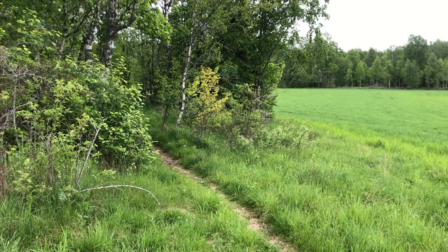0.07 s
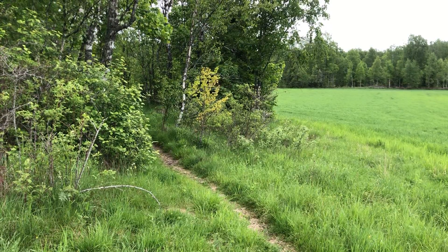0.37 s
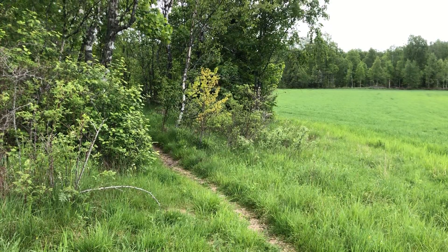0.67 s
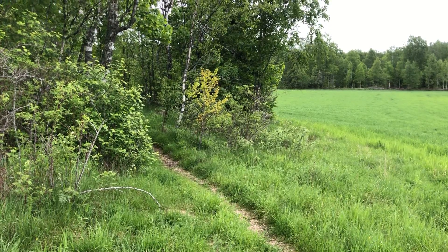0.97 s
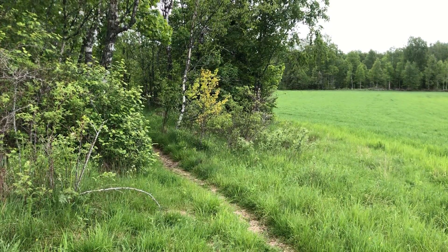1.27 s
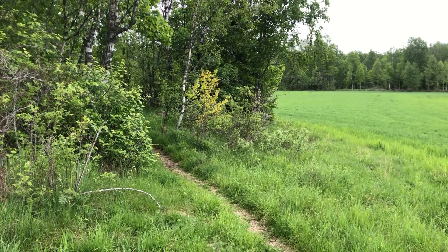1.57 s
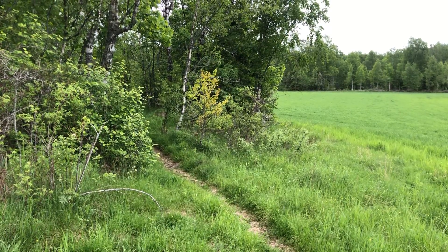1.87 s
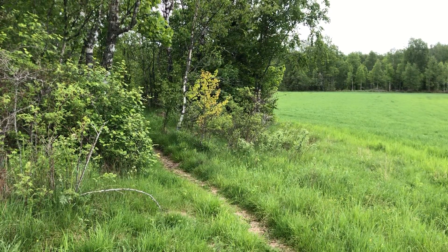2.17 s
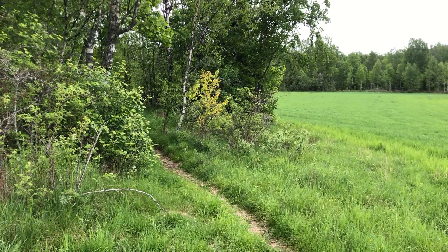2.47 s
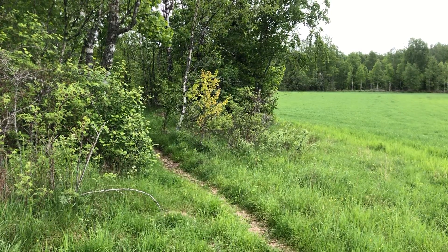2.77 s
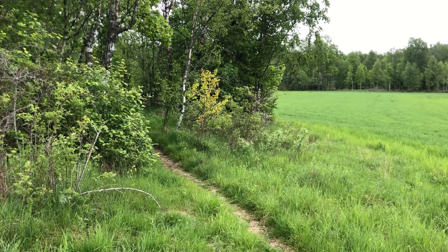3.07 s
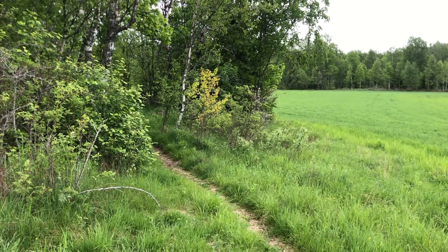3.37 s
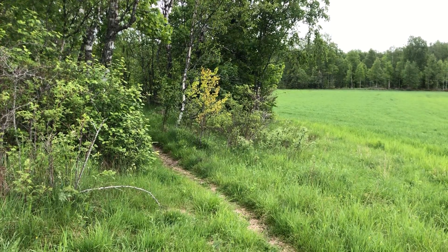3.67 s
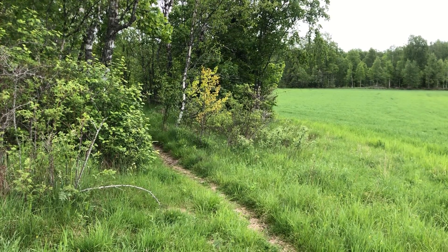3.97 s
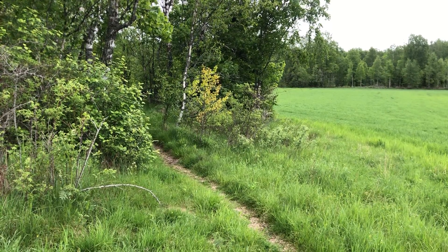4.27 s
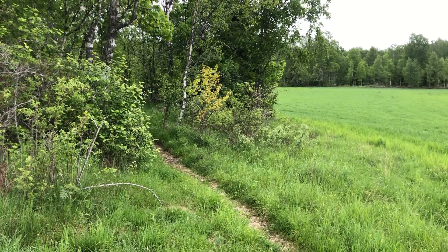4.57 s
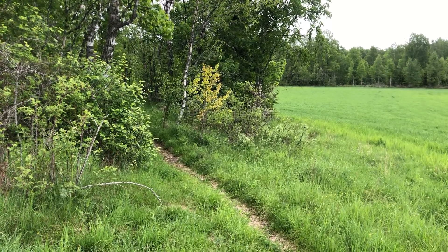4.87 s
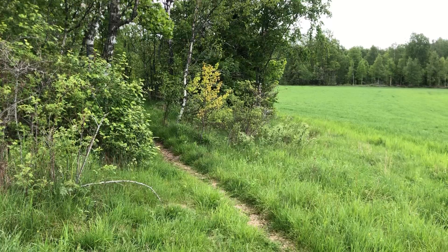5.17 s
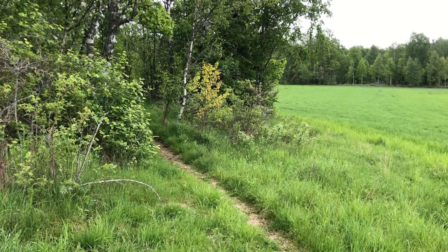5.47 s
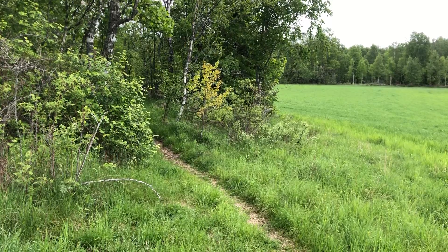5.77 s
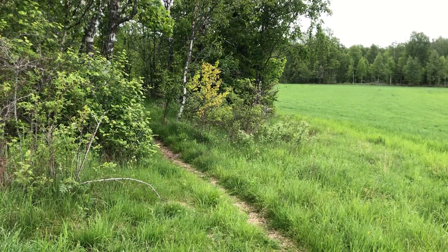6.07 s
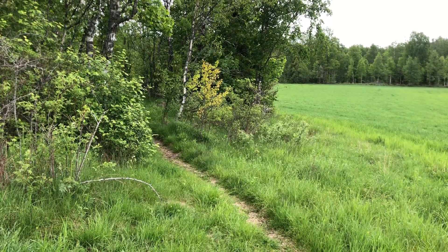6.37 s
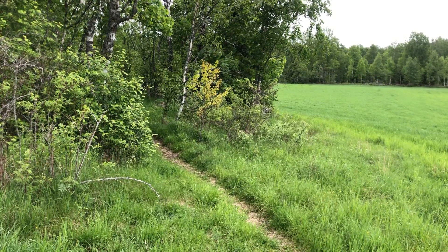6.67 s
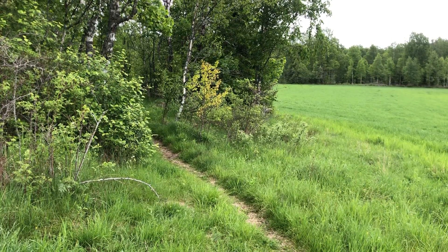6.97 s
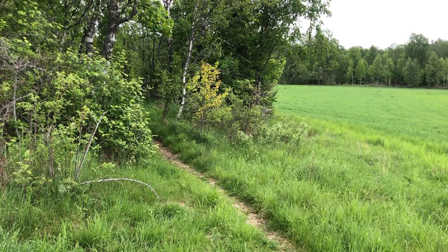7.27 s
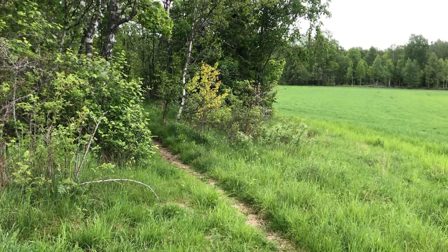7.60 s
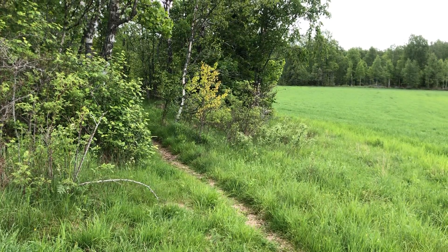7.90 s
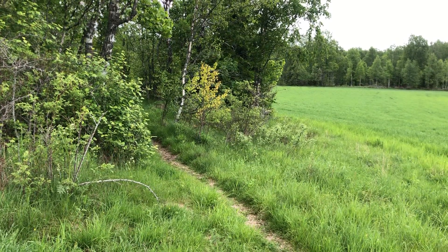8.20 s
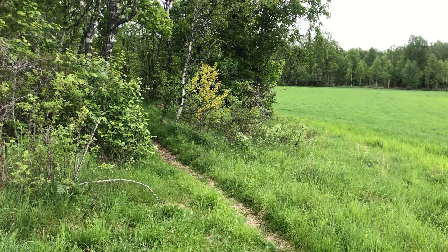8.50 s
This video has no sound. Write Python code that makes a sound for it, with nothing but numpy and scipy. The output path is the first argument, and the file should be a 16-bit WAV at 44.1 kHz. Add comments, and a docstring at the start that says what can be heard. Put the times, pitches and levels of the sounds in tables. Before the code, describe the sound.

At the edge of a meadow, a bird in a bush close to the microphone reels a high, fast, even trill like an insect. It runs for about seven seconds and stops. Farther off, other birds whistle and twitter faintly with a slight woodland echo, carrying on after the trill ends. Underneath are a very quiet distant hush, stirring leaves and a few soft bumps of breeze on the microphone.

```python
"""A grasshopper warbler reels from a bush close to the microphone, at the edge of a meadow: 27 times
a second its syrinx gives a sharp tick and a short falling note, until it slows and stops after seven
seconds. Farther off, thrushes and warblers whistle in the wood, echoing from leaves and trunks.
Behind them lie a distant hush and stirring foliage; a light breeze now and then bumps the microphone."""
import sys
import numpy as np
from scipy import signal
from scipy.fft import rfft, irfft, next_fast_len
from scipy.io import wavfile
from scipy.ndimage import uniform_filter1d, map_coordinates

SR = 44100
rng = np.random.default_rng(int(sys.argv[2]) if len(sys.argv) > 2 else 0)


def waveform_to_disk(signal):
    """Save audio, clipped to [-1, 1], as 16-bit WAV at the path in sys.argv[1]."""
    frames = np.transpose(np.atleast_2d(signal))
    scaled = np.clip(frames, -1, 1) * 32767
    samples = np.round(scaled).astype(np.int16)
    wavfile.write(sys.argv[1], SR, samples)


N = 385434


def amp(db):
    """Decibels to gain."""
    return 10 ** (np.asarray(db) / 20)


def unit(x):
    """Scale to rms 1."""
    return x / np.sqrt(np.mean(x ** 2) + 1e-20)


def along(points, hz):
    """Read (frequency, value) points at hz, on a log frequency axis."""
    f, v = np.transpose(points)
    return np.interp(np.log(hz + 1), np.log(f + 1), v)


def wobble(rate, size=N):
    """A smooth random curve, rate knots a second."""
    knots = rng.standard_normal(int(size * rate / SR) + 4)
    return map_coordinates(knots, [np.arange(size) * rate / SR])


def bump(s, width):
    """A bell-shaped rise and fall around time s."""
    return np.exp(-.5 * ((np.arange(N) / SR - s) / width) ** 2)


def progress(length):
    """0 to 1 over a note of this length in s."""
    return np.linspace(0, 1, int(length * SR))


def filtered(x, response):
    """Filter x by a gain given as a function of frequency."""
    m = next_fast_len(N + SR // 2)
    return irfft(rfft(x, m) * response(np.fft.rfftfreq(m, 1 / SR)), m)[:N]


def noise(spectrum):
    """Noise of rms 1, coloured by rows of f/Hz, relative level/dB."""
    return unit(filtered(rng.standard_normal(N), lambda hz: amp(along(spectrum, hz))))


def add(track, s, sound):
    """Mix a sound into the track from time s on."""
    at = round(s * SR) + np.arange(len(sound))
    inside = (at >= 0) & (at < N)
    track[at[inside]] += sound[inside]


# spectrum of the far background: f/Hz, relative level/dB
HUSH_SPECTRUM = [(15, -62), (25, -17), (71, 1), (149, -0.5), (202, -4.5), (501, -6), (967, -9), (1400, -16),
                 (1820, -18.5), (3080, -120)]
def distant_hush(db=-64.5):
    """A low, nearly steady hush from far across the meadow."""
    return amp(db + .98 * wobble(2.12)) * noise(HUSH_SPECTRUM)


def far_swell(db=-68):
    """A dull, hollow rush rises and fades in the distance."""
    hollow = noise([(300, -30), (520, 0), (650, -2), (1100, -14), (3000, -80)])
    return amp(db) * bump(7.53, width=.17) * hollow


# spectrum of the rustle: f/Hz, relative level/dB
LEAF_SPECTRUM = [(900, -10), (1500, 0), (3500, 0), (5000, -4), (8000, -12), (15500, -13.5), (17000, -40)]
def foliage(db=-73.5):
    """Leaves stir faintly along the meadow's edge."""
    return amp(db + .5 * wobble(2)) * noise(LEAF_SPECTRUM)


# puffs of air on the microphone: t/s, level/dB, width/s
MIC_PUFFS = [(0.433, -57.5, 0.024), (0.64, -52.5, 0.014), (0.718, -48, 0.0074), (1.277, -66, 0.017),
             (2.398, -57, 0.036), (3.337, -47.5, 0.01), (3.446, -62, 0.026), (4.316, -54, 0.024),
             (5.4, -69, 0.14)]
def wind_on_microphone(breeze_db=-74):
    """The breeze buffets the microphone: a low rumble with a few soft bumps."""
    puffs = sum(amp(db) * bump(s, width) for s, db, width in MIC_PUFFS)
    breeze = amp(breeze_db + 3 * wobble(6))
    rumble = noise([(26, -50.5), (46, -1), (80, -3), (140, -9.5), (300, -29.5), (1000, -84.5)])
    return (puffs + breeze) * rumble


def scatter(x, decay):
    """Dense echoes: a noise tail in which each frequency dies at its own speed."""
    hz, t, spectra = signal.stft(rng.standard_normal(SR // 2), SR, nperseg=256)
    fade = amp(-60 * t / along(decay, hz)[:, None])
    tail = signal.istft(spectra * fade, SR, nperseg=256)[1]
    return signal.fftconvolve(x, tail / np.linalg.norm(tail))[:N]


# reverberation of the wood: f/Hz, t60/s
WOOD_DECAY = [(1500, .55), (4000, .28), (12000, .2)]
def wood_echoes(songs):
    """Leaves and trunks throw the songs back; the treble dies first."""
    return scatter(songs, WOOD_DECAY)


def chatter(centre_hz, pace):
    """A barely audible singer: wandering whistles that come and go at random."""
    pitch = centre_hz * np.exp(.15 * wobble(2 * pace))
    bursts = np.clip(wobble(pace), 0, 1) ** 2
    return unit(bursts * np.sin(2 * np.pi * np.cumsum(pitch) / SR))


def sing(pitch, db, waver_hz=12):
    """A bird's pure note along a pitch line; it wavers a little and swells in its middle."""
    size = len(pitch)
    swell = np.abs(np.sin(np.linspace(0, np.pi, size))) ** .8
    gain = amp(db + 2 * wobble(60, size))
    phase = 2 * np.pi * np.cumsum(pitch + waver_hz * wobble(127, size)) / SR
    return swell * gain * np.sqrt(2) * np.sin(phase)


# phrases from deep in the wood: t/s, length/s, f/Hz, level/dB
DEEP_PHRASES = [(0.901, 0.15, 2650, -71.5), (4.882, 0.16, 2330, -69.5), (5.85, 0.21, 2660, -73),
                (7.65, 0.26, 1865, -67), (8.32, 0.13, 1790, -67)]
def faint_phrases(wander=.039, turns_per_s=16):
    """Far singers, each wandering around one pitch."""
    songs = np.zeros(N)
    for s, length, hz, db in DEEP_PHRASES:
        pitch = hz * np.exp(wander * wobble(turns_per_s, int(length * SR)))
        add(songs, s, sing(pitch, db))
    return songs


# bouts of twittering in the wood: t/s, length/s, centre f/Hz, level/dB
TWITTER_BOUTS = [(1.422, 1.05, 2750, -66), (3.147, .55, 3520, -66.5)]
def twitters(every_s=.085, note_s=.029, sweep=.123, spread=.072):
    """Runs of brief notes, each sweeping up or down at a pitch of its own."""
    songs = np.zeros(N)
    for start, length, hz, db in TWITTER_BOUTS:
        for s in np.arange(start, start + length, every_s):
            late, high, way, loud = rng.standard_normal(4)
            glide = np.sign(way) * sweep * (2 * progress(note_s) - 1)
            add(songs, s + late * note_s / 2, sing(hz * np.exp(spread * high + glide), db + 2 * loud))
    return songs


# kinds of note: start, middle, end as shares of the pitch
NOTE_SHAPES = {"scoop": (1.04, 0.94, 1.4), "slur": (.97, 0.98, .87), "flick": (1.24, 0.98, 0.835),
               "rise": (.93, 0.94, 1.28), "hold": (0.93, 0.97, 0.96)}
# the songbird's motifs: t/s, kind of note, times sung, note length/s, f/Hz, level/dB
SONGBIRD_MOTIFS = [(1.457, "scoop", 4, .068, 4450, -58.5), (1.899, "flick", 1, 0.022, 3140, -60),
                   (1.969, "slur", 2, 0.15, 4220, -58.5), (2.49, "flick", 1, 0.048, 4650, -59),
                   (2.613, "slur", 3, .097, 3195, -66), (2.667, "flick", 1, 0.049, 4700, -62),
                   (3.13, "rise", 3, 0.052, 4400, -66), (7.255, "rise", 1, 0.03, 3900, -68),
                   (7.361, "rise", 1, .075, 3740, -63.5), (8.089, "flick", 1, .046, 3260, -54),
                   (8.179, "hold", 1, 0.041, 3300, -52), (8.217, "flick", 1, 0.016, 3920, -56.5),
                   (8.222, "hold", 1, 0.033, 4320, -56)]
def small_songbird(pause_s=.064):
    """A small bird off in the wood sings curved notes, singly or repeated."""
    songs = np.zeros(N)
    for s, kind, times, length, hz, db in SONGBIRD_MOTIFS:
        parabola = np.polyfit([0, .5, 1], NOTE_SHAPES[kind], 2)
        pitch = hz * np.polyval(parabola, progress(length))
        for k in range(round(times)):
            add(songs, s + k * (length + pause_s), sing(pitch, db))
    return songs


# warbled notes, each around a straight glide: t/s, length/s, start f/Hz, end f/Hz, level/dB
TRILL_NOTES = [(0.319, 0.23, 2030, 2270, -67.5), (0.81, 0.13, 2170, 2105, -67),
               (2.764, 0.17, 2100, 2053, -62.5), (5.243, 0.23, 2220, 2057, -63.5),
               (5.609, 0.26, 2135, 1830, -69), (6.25, 0.16, 2340, 2370, -68),
               (6.567, 0.21, 2116, 2000, -66), (6.982, 0.12, 2060, 2240, -63.5),
               (7.089, .2, 2336, 2266, -59.5), (7.971, .092, 3170, 4280, -59.5)]
def far_trills(warble_hz=50.9, depth_at_2khz=.04, droop=.08):
    """Trills from the wood: the pitch droops at both ends, and higher notes warble more widely."""
    songs = np.zeros(N)
    for s, length, start, end, db in TRILL_NOTES:
        u = progress(length)
        glide = start + (end - start) * u
        depth = depth_at_2khz * (glide / 2000) ** 2.5
        warble = depth * np.sin(2 * np.pi * warble_hz * length * u + 1.3 * wobble(70, len(u)))
        add(songs, s, sing(glide * (1 + warble - droop * (2 * u - 1) ** 2), db))
    return songs


# fluty whistles in the wood: t/s, length/s, start f/Hz, goal f/Hz, level/dB
THRUSH_WHISTLES = [ (0.593, 0.061, 2290, 1540, -65), (1.212, .13, 2680, 2440, -66),
                   (1.37, 0.16, 2050, 1850, -69.5), (2.653, 0.13, 2150, 1880, -66.5),
                   (3.002, 0.1, 2030, 1937, -62.5), (3.257, 0.2, 2990, 2420, -59),
                   (4.67, 0.13, 2020, 2085, -68), (5.168, 0.074, 2130, 1624, -63),
                   (6.214, 0.076, 1730, 2500, -64), (6.875, .12, 2640, 2366, -60),
                   (6.908, 0.074, 2396, 1717, -59.5), (7.15, 0.106, 1940, 1526, -57),
                   (7.234, 0.27, 2440, 2370, -57), (7.381, 0.087, 1780, 1670, -57.5),
                   (7.431, 0.13, 2090, 1947, -53), (7.739, 0.27, 2540, 2653, -56.5),
                   (8.473, 0.24, 2416, 1945, -56.5)]
def thrushes(goal_s=.145):
    """Each whistle swoops toward its goal pitch and turns back if it lasts beyond goal_s."""
    songs = np.zeros(N)
    for s, length, start, goal, db in THRUSH_WHISTLES:
        swoop = (1 - length * progress(length) / goal_s) ** 2
        add(songs, s, sing(goal + (start - goal) * swoop, db))
    return songs


# reverberation of the near bush: f/Hz, t60/s
BUSH_DECAY = [(6000, .23), (12000, .14)]
# the bush scatters treble most: f/Hz, level/dB
BUSH_COLOUR = [(6000, -13), (9000, -10.5), (11800, -1.5)]
def bush_echoes(song, sways_per_s=4, count=5):
    """Echoes from the leaves around the warbler; they shift as the twigs sway."""
    sway = np.array([wobble(sways_per_s) for _ in range(count)])
    weights = sway / np.linalg.norm(sway, axis=0)
    echoes = sum(weight * scatter(song, BUSH_DECAY) for weight in weights)
    return filtered(echoes, lambda hz: amp(along(BUSH_COLOUR, hz)))


def rasp(song, db=-36):
    """A faint broad hiss that swells and sinks with the warbler's syllables."""
    envelope = np.sqrt(np.abs(uniform_filter1d(song ** 2, size=400)))
    hiss = noise([(2500, 6.5), (3600, 1), (7000, -15), (8800, -10), (10000, 6.5), (15500, -17)])
    return amp(db) * envelope * hiss


def chirp(shape, shift_hz, rough_hz, octave_db, stretch):
    """One gesture of the syrinx: a gliding, slightly rough whistle with a weak octave."""
    ms, hz, db = np.transpose(shape)
    knots = np.maximum.accumulate(ms) * stretch * SR / 1000
    n = np.arange(SR // 90)
    pitch = np.interp(n, knots, hz) + shift_hz + rough_hz * wobble(2760, len(n))
    phase = 2 * np.pi * np.cumsum(pitch) / SR
    envelope = np.interp(n, knots, amp(db), right=0)
    return envelope * (np.sin(phase) + amp(octave_db) * np.sin(2 * phase))


# the two halves of a syllable: t/ms, base f/Hz, relative level/dB
TICK_GESTURE = [(0, 3800, -30), (.35, 4900, -15), (.65, 5950, -4), (.95, 6500, 0), (1.4, 6850, -4),
                (1.75, 6200, -12), (2.2, 6450, -9.5), (3.9, 6490, -14), (4.9, 6400, -50)]
NOTE_GESTURE = [(0, 6200, -30), (.45, 5990, -1.5), (1, 5900, 0), (3, 5830, -.4), (4.8, 5720, -2.4),
                (6, 5600, -9), (7.2, 5560, -45)]
# stretches of steady pace: t/s, syllables sung so far
REEL_PACE = [(0.0048, 0), (0.3714, 10), (1.3504, 37), (2.2781, 62), (3.1621, 86), (5.7677, 157),
             (6.434, 175), (6.9467, 189), (7.062, 192), (7.1056, 193)]
# the singer's effort: t/s, note level at the syrinx/dB
REEL_EFFORT = [(0.0, -32.5), (1.35, -29.5), (1.39, -34), (1.87, -33.5), (2.02, -31.5), (2.98, -30.5),
               (3.09, -28.5), (3.97, -27.5), (4.23, -29.5), (4.59, -29), (4.78, -26.5), (5.22, -26),
               (7.06, -29), (7.11, -35)]
# colour of throat and beak: f/Hz, gain/dB
THROAT_COLOUR = [(2900, -1.5), (3600, 10.5), (4000, -6), (4400, 5), (4750, -0.5), (5250, 1.5), (5900, 0.5),
                 (7000, -1), (7500, -5), (8800, -2), (10000, -5), (13000, 1.5)]
def grasshopper_warbler(note_db=-30, tick_db=-27, uneven_db=.25, sag_hz_per_db=16.5, tick_lead_s=.0131):
    """The close reel: tick and note alternate; harder singing lifts both and pulls the note flat."""
    knot_s, sung = np.transpose(REEL_PACE)
    times = np.interp(np.arange(round(sung[-1]) + 1), sung, knot_s)
    at = np.clip(times * SR, 0, N - 1).astype(int)
    # effort counts from the middling level note_db; level and pitch also drift slowly
    efforts_db = np.interp(times, *np.transpose(REEL_EFFORT)) - note_db + .35 * wobble(4.2)[at]
    shifts_hz = 49.7 - sag_hz_per_db * efforts_db + 20 * wobble(2.5)[at]
    song = np.zeros(N)
    for s, effort, shift in zip(times, efforts_db, shifts_hz):
        # no two syllables are quite alike
        tick_loud, note_loud, tick_long, timing, tick_high, note_high = rng.standard_normal(6)
        tick = chirp(TICK_GESTURE, 50 * tick_high,
                     rough_hz=140, octave_db=-34, stretch=1 + .04 * tick_long)
        note = chirp(NOTE_GESTURE, shift + 22 * note_high,
                     rough_hz=35, octave_db=-32, stretch=1 + .05 * timing)
        tick *= amp(tick_db + .42 * effort + uneven_db * tick_loud)
        note *= amp(note_db + effort + uneven_db * note_loud)
        add(song, s - tick_lead_s + .00015 * timing, tick)
        add(song, s - .0003, note)
    return filtered(song, lambda hz: amp(along(THROAT_COLOUR, hz)))


def scene():
    """From the meadow's edge: the farther the bird, the more of its song arrives as the wood's echo."""
    reel = grasshopper_warbler()
    reel = reel + rasp(reel)
    high_chatter = amp(-80 + 6 * bump(3, width=.8)) * chatter(centre_hz=3700, pace=42)
    deep_chatter = amp(-82) * chatter(centre_hz=2100, pace=14)
    birds = thrushes() + far_trills() + small_songbird() + twitters()
    faint = faint_phrases()
    wood = wood_echoes(amp(-10) * birds + amp(-4) * faint + deep_chatter + high_chatter + amp(-23) * reel)
    far_direct = amp(-1) * birds + amp(-3) * faint + .5 * high_chatter
    near = reel + bush_echoes(reel)
    air = wind_on_microphone() + distant_hush() + foliage() + far_swell()
    return (air + wood + far_direct + near)[None]


def record(dry, top_hz=16050):
    """One microphone on a camera that keeps nothing above its band limit."""
    return filtered(dry[0], lambda hz: hz < top_hz)[None]


dry = scene()
out = record(dry)
waveform_to_disk(out)
```